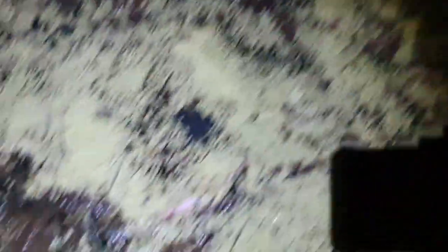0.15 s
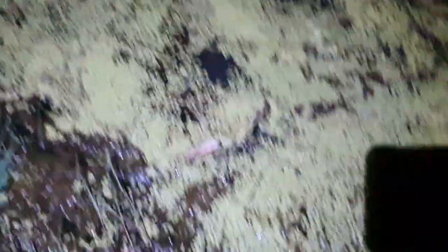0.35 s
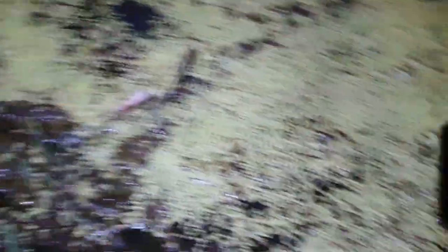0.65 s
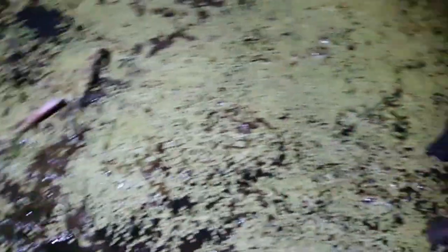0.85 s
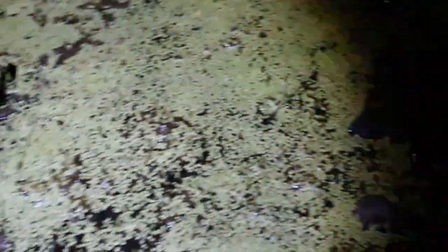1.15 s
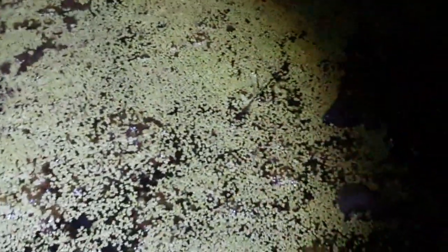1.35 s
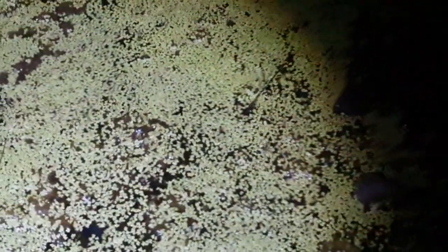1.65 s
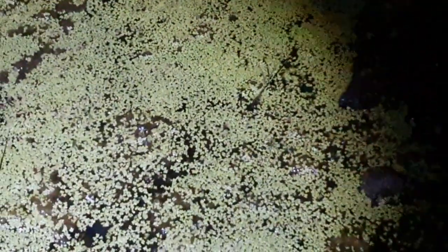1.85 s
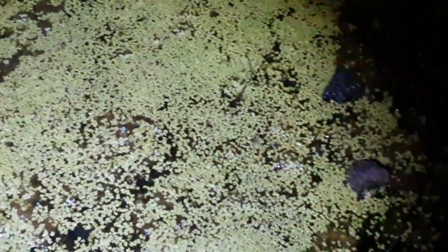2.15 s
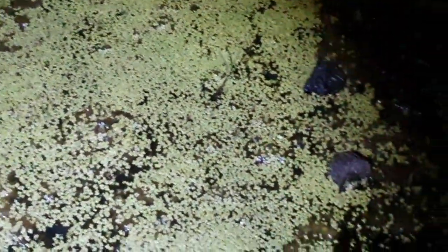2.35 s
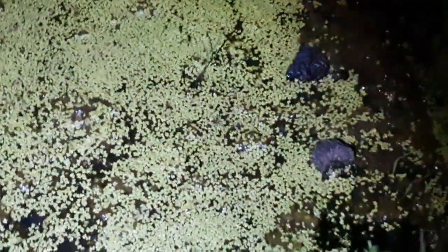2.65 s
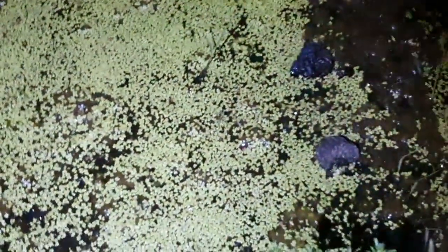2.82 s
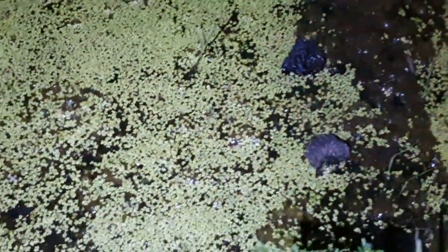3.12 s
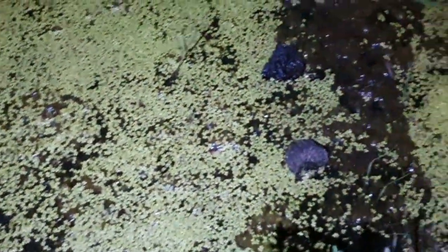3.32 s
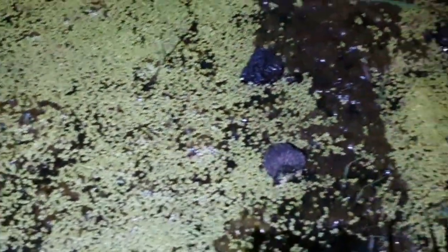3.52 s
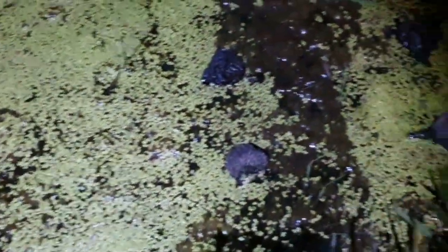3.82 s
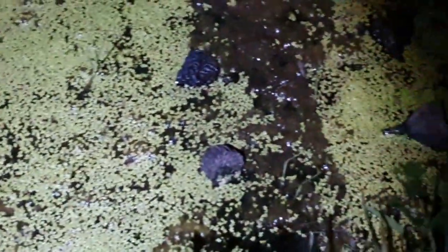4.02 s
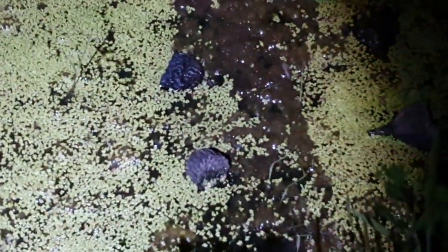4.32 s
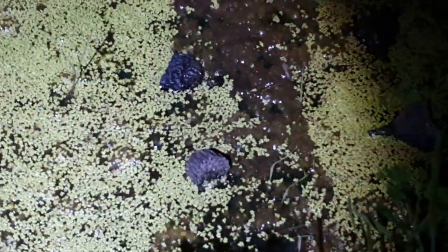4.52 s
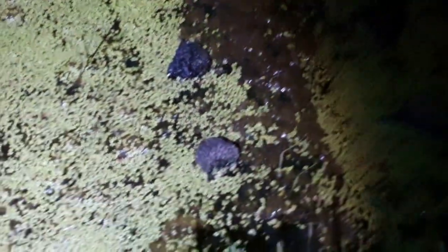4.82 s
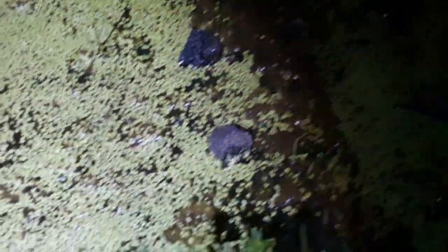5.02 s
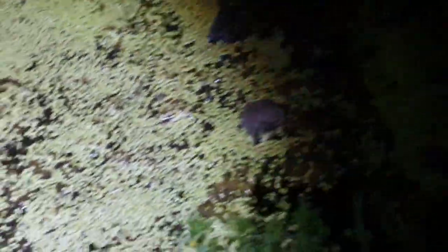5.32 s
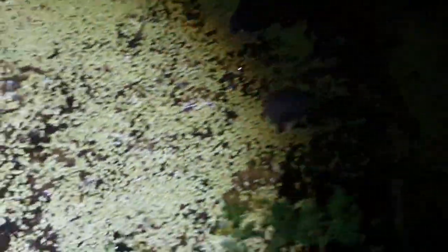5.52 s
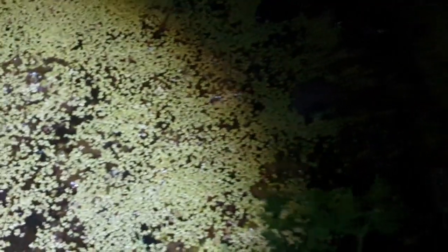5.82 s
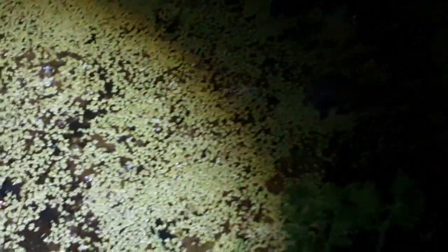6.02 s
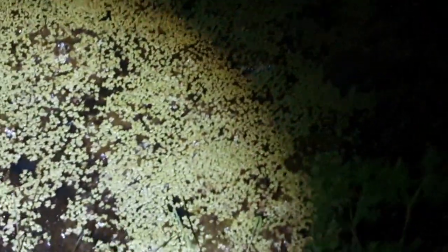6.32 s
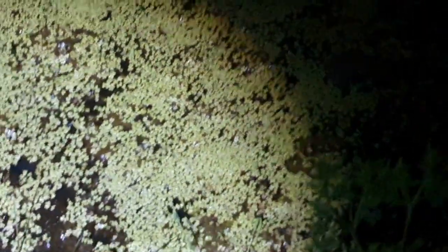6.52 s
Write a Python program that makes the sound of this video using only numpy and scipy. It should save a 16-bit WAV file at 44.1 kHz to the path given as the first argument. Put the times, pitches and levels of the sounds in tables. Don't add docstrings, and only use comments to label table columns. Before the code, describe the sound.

High, grating frog croaks dominate a night pond. The nearest is crisp and slightly left of centre; four softer, echoing neighbours overlap on the left bank, with a blurred chorus beyond. A bigger frog adds barely audible hoarse low notes. A thin water hiss at the left drops quickly and fades, a few tiny dry ticks occur, and low hum stays underneath, heard through a handheld stereo microphone outdoors.

```python
import sys
import numpy as np
from scipy import signal
from scipy.fft import rfft, irfft, next_fast_len
from scipy.io import wavfile

SR = 44100
rng = np.random.default_rng(int(sys.argv[2]) if len(sys.argv) > 2 else 0)


def waveform_to_disk(signal):
    frames = np.transpose(np.atleast_2d(signal))
    scaled = np.clip(frames, -1, 1) * 32767
    samples = np.round(scaled).astype(np.int16)
    wavfile.write(sys.argv[1], SR, samples)


def boost(x):
    u = np.asarray(x, float) / 20
    return 10 ** u


N = 293706

# frequency in Hz, density in dB per Hz.
NIGHT_SPECTRUM = [(15, -56), (25, -22), (76, -12.5), (333, -34.5), (691, -28), (881, -21.5), (1040, -12),
                  (1180, -6.5), (1780, -22), (2460, -1), (2660, 5), (3680, -24), (5370, -34.5),
                  (10000, -48.5), (15800, -63)]
# frequency in Hz, correlation from 0 to 1.
LIKENESS = [(25, 1), (100, 0.92), (250, 0.9), (600, 0.16), (4000, 0.038)]
# centre in Hz, width in Hz, level in dB.
MOTOR_BANDS = [(76.5, 2.5, 0.5), (70, 20.6, -8.5), (283.8, 6.1, -17), (453, 4.3, -18), (574, 3, -39)]
# frequency in Hz, density in dB per Hz.
HISS_SPECTRUM = [(2650, -3.5), (4500, 4), (6230, -4.5), (6740, 2.5), (7690, -5.5), (13400, -2.5),
                 (14600, -7.5), (15800, -7.5)]
# Hz at first pulse, Hz at last, dB at first, dB at last,
# decay time t60 in ms at first, t60 in ms at last.
SAC_MODES = [(1123, 1243, -2, -2, 31, 53), (1160, 1600, 4, -6, 24.2, 35.4),
             (1820, 2530, -6, -6.5, 32.6, 9.2), (2504, 2707, 5, 4, 53.2, 25.4),
             (2760, 2978, 7, -1, 13.2, 7.2), (3090, 3420, -18.5, -7, 25, 8.6),
             (3877, 4205, -15, -11, 18, 8.8)]
# centre in Hz, width in Hz, dB at first pulse, dB at last.
SNAP_BANDS = [(5100, 2760, -35, -45.5), (6830, 980, -35.5, -50.5), (8120, 830, -31, -44),
              (9400, 1360, -39, -40), (11200, 1000, -48.5, -51.5), (14800, 2500, -73.5, -64.5)]
# start in seconds, level in dB.
LOW_FROG = [(0.056, -36), (.359, -33.5), (0.647, -36.5), (.975, -40), (1.314, -34.5), (1.63, -31.5),
            (1.915, -32.5), (2.2, -31.5), (2.482, -36.5), (2.836, -31.5), (3.166, -36), (3.49, -29.5),
            (3.775, -30), (4.096, -33.5), (4.385, -31), (4.673, -31.5), (4.964, -32), (5.275, -36),
            (5.585, -31), (5.887, -35), (6.169, -29.5), (6.582, -33)]
MIDDLE_FROG = [(.304, -33.5), (0.608, -42), (.995, -34.5), (1.125, -34), (2.056, -31), (2.294, -38.5),
               (2.469, -30), (2.915, -37), (3.288, -33), (5.249, -37), (5.344, -40.5), (5.864, -32.5),
               (6.493, -33)]
LOUD_FROG = [(.53, -30.5), (.839, -29.5), (1.244, -28.5), (1.581, -29), (1.876, -31), (2.154, -27),
             (2.246, -39), (2.711, -29), (2.997, -28), (3.389, -40.5), (4.23, -30.5), (4.525, -28.5),
             (4.811, -30.5), (5.05, -38.5), (5.434, -29), (5.723, -31), (6.019, -35.5)]
HIGH_FROG = [(-.025, -34), (0.233, -31.5), (.979, -37), (1.498, -32), (1.817, -31.5), (2.653, -33.5),
             (2.789, -31), (3.081, -35), (3.338, -30), (3.664, -30.5), (3.831, -34.5), (4.127, -34),
             (4.951, -36.5), (6.324, -31), (6.575, -32.5)]
# voice in Hz, left-right balance in dB, low band in dB, snap in dB.
SEATS = [
    (2333, 6, -8, 26.5),
    (2526, 9, -7.5, 29),
    (2637, 7.5, -4.5, 25.5),
    (2710, 8, -5, 26),
]
# start in seconds, peak in dB, pitch in Hz.
DEEP_NOTES = [
    (0.024, -54, 617),
    (0.472, -47, 530),
    (1.079, -72, 513),
    (6.023, -53, 583),
]
# start in seconds, pulse count, mean gap in ms, level in dB, brightness in dB.
NEAR_CROAKS = [(0.1153, 15, 6.88, -18.5, -8), (0.4203, 13, 6.95, -17.9, -5), (0.7072, 15, 6.65, -17.8, -1),
               (2.3851, 15, 5.98, -17.2, 2.5), (3.2306, 15, 5.93, -16.8, 2.5), (3.5459, 15, 6.13, -17.8, 1),
               (3.9401, 14, 6.48, -17.1, -.5), (4.3507, 14, 6.48, -17.0, -2),
               (4.7324, 14, 6.53, -16.7, -1.5), (5.1302, 14, 6.55, -16.3, -1), (5.5836, 14, 6.63, -16.7, 2),
               (5.9697, 15, 6.63, -16.9, 1.5), (6.4417, 14, 6.65, -16.5, 2.5)]
# time in seconds, left lead of near frog in ms, its left-right dB.
MIC_TURN = [(0, -.04, 2.8), (.7, -.02, 5.1), (2.4, .02, 5.2), (3.25, .06, 6.1), (3.95, .09, 2.4),
            (4.4, .11, 2.1), (5.6, .03, 4.3), (6.66, -.02, 2.4)]
# time in seconds, peak in dB, left-right balance in dB.
TICKS = [
    (0.1256, -37, 10.5),
    (0.836, -50, -16),
    (1.0969, -46.5, 2.5),
    (6.6574, -48.5, 21.5),
]

VOICE_HZ = 2600
SNAP_STAGES = 5
LEAD_IN = 2000
ROOM = 12000


def rms_one(x):
    return x / np.sqrt(np.mean(x ** 2) + 1e-20)


def in_time(rows, s):
    at_s, *columns = np.transpose(rows)
    return [np.interp(s, at_s, column) for column in columns]


def at_hz(points, hz):
    points_hz, values = np.transpose(points)
    return np.interp(np.log(hz + 1), np.log(points_hz), values)


def peak(hz, centre_hz, width_hz):
    return 1 / (1 + 2j * (hz - centre_hz) / width_hz)


def shaped(x, response):
    n = x.shape[-1]
    size = next_fast_len(n + 4096)
    hz = np.arange(size // 2 + 1) * SR / size
    return irfft(rfft(x, size) * response(hz), size)[..., :n]


def highpass(x, order, hz):
    return signal.sosfilt(signal.butter(order, hz, "high", fs=SR, output="sos"), x)


def noise(response):
    mid, side = rng.standard_normal((2, N))
    alike = lambda hz: np.clip(at_hz(LIKENESS, hz), 0, .99)
    mid = shaped(mid, lambda hz: response(hz) * np.sqrt(1 + alike(hz)))
    side = shaped(side, lambda hz: response(hz) * np.sqrt(1 - alike(hz)))
    return rms_one(np.array([mid + side, mid - side]))


def night_air():
    return boost(-33) * noise(lambda hz: boost(at_hz(NIGHT_SPECTRUM, hz)))


def hum():
    tone_hz, tone_db, rumble_db = 76.5, -57, -61
    rumble = noise(lambda hz: sum(boost(db) * peak(hz, f_hz, w_hz) ** 2 for f_hz, w_hz, db in MOTOR_BANDS))
    tone = np.sin(2 * np.pi * tone_hz * np.arange(N) / SR)
    return boost(rumble_db) * rumble + boost(tone_db) * tone


def fading_hiss():
    burst_db, burst_end_s, burst_edge_s = -52.5, .21, .024
    faint_db, fade_db_per_s2 = -61, 6
    t = np.arange(N) / SR
    burst = boost(burst_db) * (1 - np.tanh((t - burst_end_s) / burst_edge_s)) / 2
    faint = boost(faint_db - np.minimum(fade_db_per_s2 * t ** 2, 35))
    hiss = noise(lambda hz: boost(at_hz(HISS_SPECTRUM, hz)))
    return (burst + faint) * hiss * boost([[4.0], [-4.0]])


def scatter(x, t60_s, wet_db, gap_ms):
    t = np.arange(int(.25 * SR)) / SR
    spray = rng.standard_normal((2, len(t))) * boost(-60 * t / t60_s) * (t > gap_ms / 1000)
    spray /= np.sqrt(np.sum(spray ** 2, axis=1, keepdims=True))
    return x + boost(wet_db) * signal.fftconvolve(x, spray, axes=1)[:, :N]


def croak_rows(s, pulses, early_ms, last_ms, level_db, pan_db, low_db):
    return np.transpose(np.broadcast_arrays(s, pulses, early_ms, last_ms, level_db, pan_db, low_db))


def ring_sac(done, size, low_db, glide, ring, chance):
    fill = .5 + glide * (done ** 0.65 - .5)
    t = np.arange(620) / SR
    pulse = 0
    for k, (hz0, hz1, db0, db1, t60_ms0, t60_ms1) in enumerate(SAC_MODES):
        hz = size * (hz0 + (hz1 - hz0) * fill) * (1 + .004 * chance[:, [2 + k]])
        mode_db = db0 + (db1 - db0) * done + low_db * (hz0 < 1700) + .9 * chance[:, [-1 - k]]
        t60_ms = ring * (t60_ms0 + (t60_ms1 - t60_ms0) * done)
        decay = np.exp(np.float32(-1000 * np.log(1000) * t / t60_ms))
        pulse = pulse + boost(mode_db) * np.sin(np.float32(2 * np.pi * hz * t)) * decay
    return pulse * (1 - np.exp(-(t / .0008) ** 1.5))


def add_croak(voice, snaps, croak, size, snap_db, lead_ms, glide, jitter_ms, damp_ms, ring):
    s, pulses, early_ms, last_ms, level_db, pan_db, low_db = croak
    count = int(round(pulses))
    chance = rng.standard_normal((20, 2 + len(SAC_MODES)))[:count]
    gaps_ms = np.linspace(early_ms, last_ms, count - 1)
    gaps_ms[0] *= 1.22
    onset_s = s + (np.r_[0, np.cumsum(gaps_ms)] - .4 + jitter_ms * chance[:, 0]) / 1000
    done = np.linspace(0, 1, count)[:, None]
    swell_db = -13.0 * (1 - done) ** 4.13 - 3.66 * done ** 4.0 + 0.46 * chance[:, 1:2]
    gain = boost(level_db + swell_db)

    pulse = ring_sac(done, size, low_db, glide, ring, chance)
    length = pulse.shape[1]
    left_ms = np.r_[gaps_ms, 14.0][:, None] - 1000 * np.arange(length) / SR
    pulse = pulse * np.clip((left_ms - .9) / damp_ms, 0, 1)

    stage = np.arange(count) * SNAP_STAGES // count
    for side, sign in enumerate((1, -1)):
        first = np.round((onset_s - sign * lead_ms / 2000) * SR).astype(int) + LEAD_IN
        for at, one in zip(first, pulse * gain * boost(sign * pan_db / 2)):
            voice[side, at:at + length] += one
        strength = gain[:, 0] * boost(snap_db + sign * pan_db / 2 + 0.3 * chance[:, 2])
        np.add.at(snaps, (stage, side, first + 45), strength)


def snap_click(done, snap_size):
    rise = snap_size * (1 - 0.057 * (1 - done) ** 2)
    hz = np.arange(513) * SR / 1024
    colour = 0
    for k, (f_hz, w_hz, db0, db1) in enumerate(SNAP_BANDS):
        band = boost(db0 + (db1 - db0) * done) * peak(hz / rise, f_hz, w_hz) ** 3
        colour = colour + (-1) ** k * band
    return irfft(colour)[None, :400]


def frogs(croaks, sizes, snaps_db, leads_ms, puff_ms, snap_size, leak_db, **manner):
    voice = np.zeros((2, N + ROOM))
    snaps = np.zeros((SNAP_STAGES, 2, N + ROOM))
    for croak, size, snap_db, lead_ms in zip(croaks, sizes, snaps_db, leads_ms):
        add_croak(voice, snaps, croak, size, snap_db, lead_ms, **manner)
    fade = np.exp(-1000 / (puff_ms * SR))
    puff = signal.lfilter([1], [1, -fade], snaps + 1e-18) * rng.standard_normal(N + ROOM)
    snaps += 0.21 * puff
    for stage, done in enumerate(np.linspace(0, 1, SNAP_STAGES)):
        click = snap_click(done, snap_size)
        voice += signal.oaconvolve(snaps[stage], click, axes=1)[:, :N + ROOM]
    edge = lambda hz: boost(leak_db) + 1 / (1 + (980 / (hz + 1)) ** 37.5)
    radiated = highpass(shaped(voice, edge) + 1e-18, 4, 680)
    return radiated[:, LEAD_IN:LEAD_IN + N]


def far_chorus():
    count = 220
    s, size, side, loud = rng.random((count, 4)).T
    start_s = (np.arange(count) + 2 * s) / count * (N / SR - .06) - .04
    croaks = croak_rows(start_s, 15, 7.1, 5.5, -42 - 12 * loud, 1 + 10 * side, low_db=-5)
    dry = frogs(croaks, .84 + .3 * size, np.full(count, 20.0), .45 * side, puff_ms=2.5, snap_size=.8,
                leak_db=-6, glide=0.62, jitter_ms=.3, damp_ms=0.7, ring=1.1)
    return scatter(dry, t60_s=.2, wet_db=3.0, gap_ms=3.0)


def neighbours():
    bank_lead_ms = .37
    rows = []
    for calls, seat in zip((LOW_FROG, MIDDLE_FROG, LOUD_FROG, HIGH_FROG), SEATS):
        rows += [(*croak, *seat) for croak in calls]
    s, level_db, hz, pan_db, low_db, snap_db = np.transpose(rows)
    pace_db, lead, tune = rng.standard_normal((len(s), 3)).T
    pace = boost(.5 * pace_db)
    croaks = croak_rows(s, 15, 7.0 * pace, 5.4 * pace, level_db + 5.0, pan_db, low_db)
    sizes = hz * (1 + 0.016 * tune) / VOICE_HZ
    dry = frogs(croaks, sizes, snap_db, bank_lead_ms + 0.058 * lead, puff_ms=3.0, snap_size=0.876,
                leak_db=-5.5, glide=0.66, jitter_ms=.08, damp_ms=1.13, ring=0.99)
    return scatter(dry, t60_s=.08, wet_db=-12, gap_ms=1.5)


def deep_frog():
    t, out = np.arange(N) / SR, 0
    for s, peak_db, hz in DEEP_NOTES:
        hoarse = rms_one(shaped(rng.standard_normal(N), lambda f: peak(f, hz, 110) ** 2))
        swell = np.exp(-((t - s - .05) / 0.055) ** 2)
        out = out + boost(peak_db - 8.5) * swell * hoarse
    return np.array([out, 0.32 * np.roll(out, 16)])


def near_frog():
    near_hz, quickening = 2598, .185
    s, pulses, gap_ms, level_db, bright_db = np.transpose(NEAR_CROAKS)
    leads_ms, pan_db = in_time(MIC_TURN, s)
    croaks = croak_rows(s, pulses, gap_ms * (1 + quickening), gap_ms * (1 - quickening),
                        level_db + 6.5, pan_db, low_db=-4)
    sizes = np.full(len(s), near_hz / VOICE_HZ)
    dry = frogs(croaks, sizes, 30.5 + bright_db, leads_ms, puff_ms=1.28, snap_size=1.016,
                leak_db=-12, glide=1.0, jitter_ms=.07, damp_ms=2.6, ring=.72)
    return scatter(dry, t60_s=.05, wet_db=-19, gap_ms=2.5)


def ticks():
    out = np.zeros((2, N))
    for s, peak_db, pan_db in TICKS:
        out[:, round(s * SR)] = boost(peak_db + 13.5 + np.array([pan_db, -pan_db]) / 2)
    return highpass(signal.lfilter([1], [1, -.6], out), 2, 7000)


def scene():
    bed = night_air() + hum() + fading_hiss()
    return bed + far_chorus() + neighbours() + deep_frog() + near_frog() + ticks()


def low_pass(x):
    return signal.sosfilt(signal.butter(12, 16370, fs=SR, output="sos"), x)


def record(dry):
    thin = highpass(dry, 3, 48)
    mix = shaped(thin, lambda hz: hz < 15830)
    return low_pass(mix)


dry = scene()
out = record(dry)
waveform_to_disk(out)
```